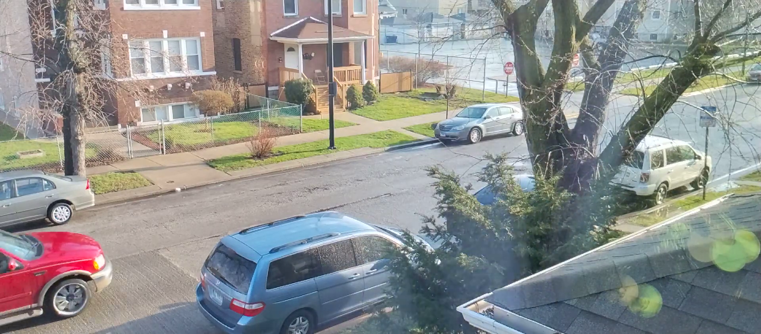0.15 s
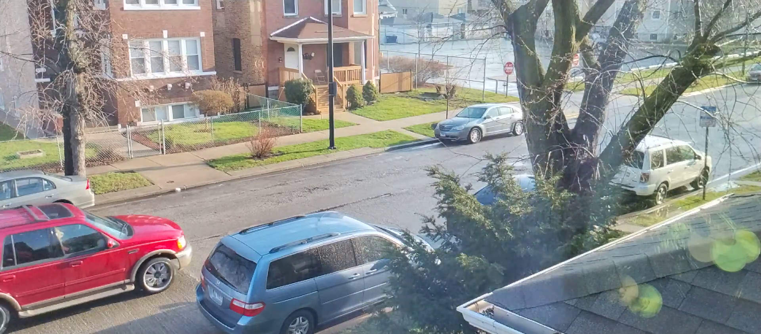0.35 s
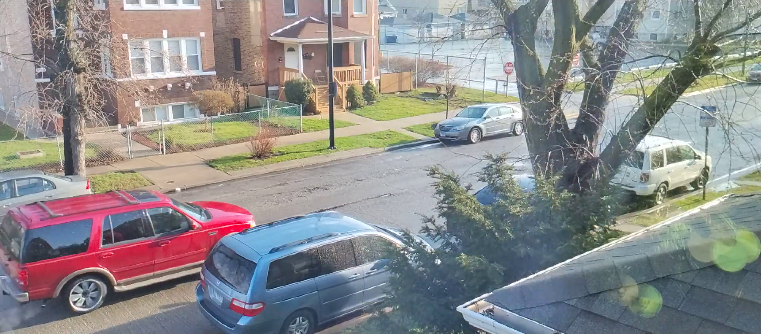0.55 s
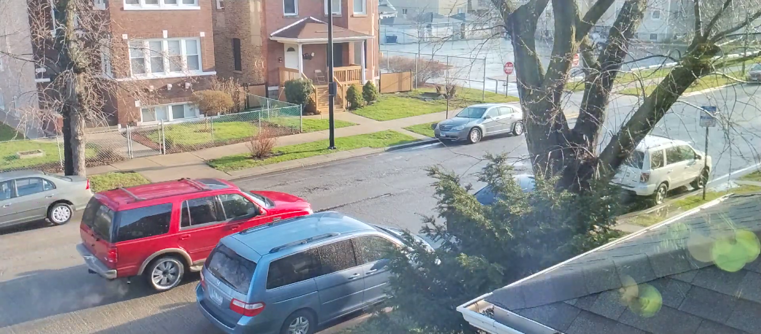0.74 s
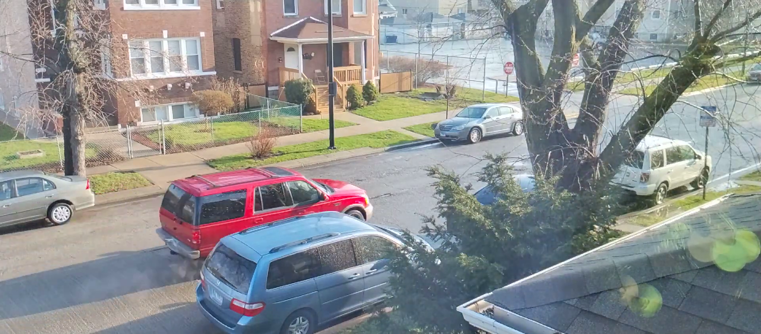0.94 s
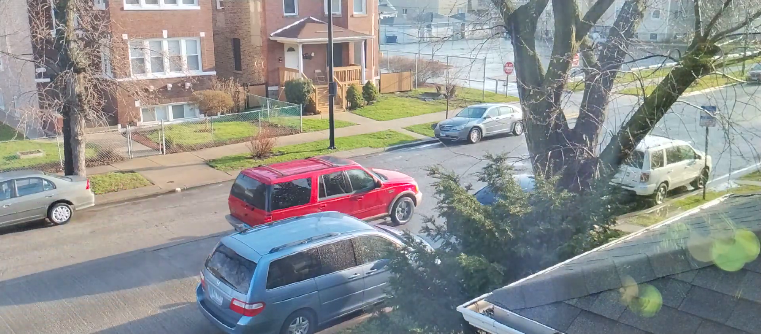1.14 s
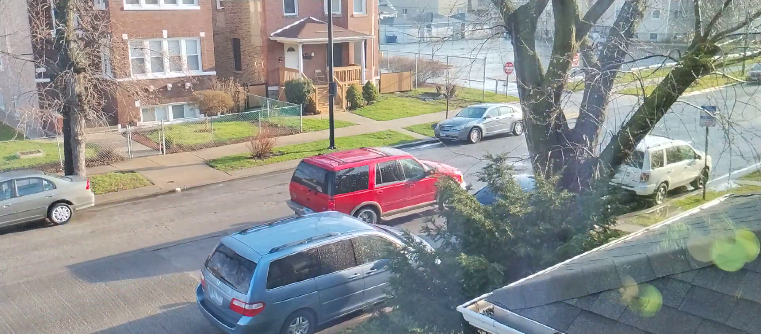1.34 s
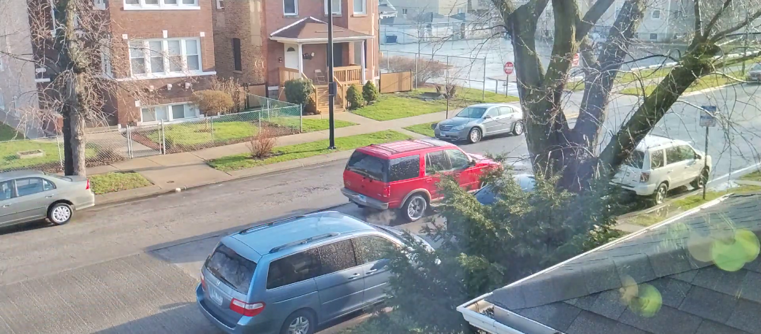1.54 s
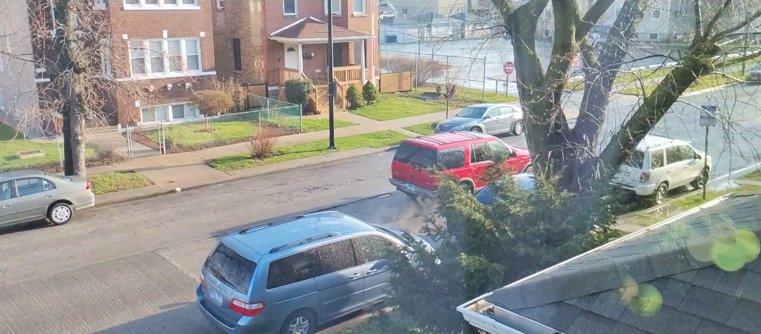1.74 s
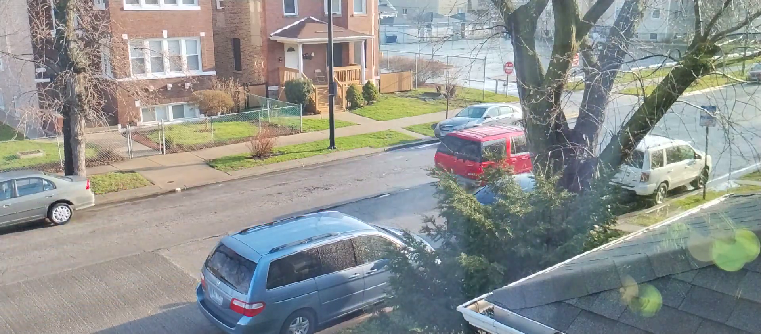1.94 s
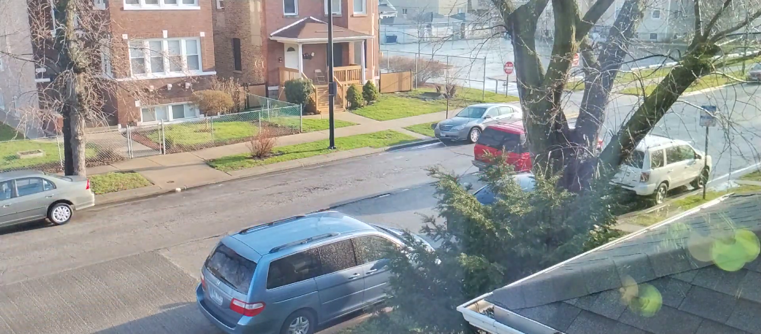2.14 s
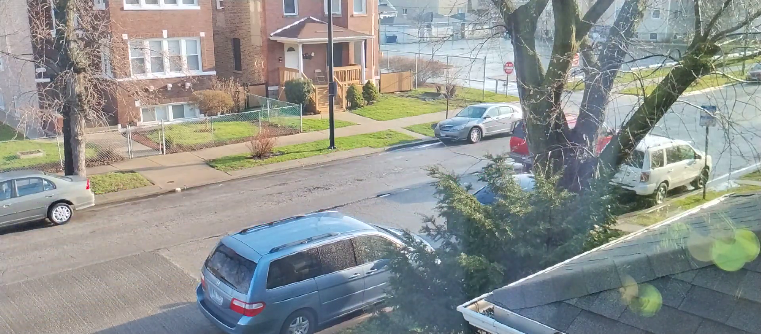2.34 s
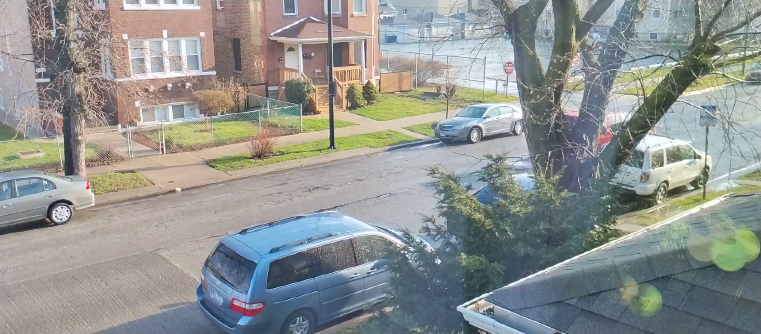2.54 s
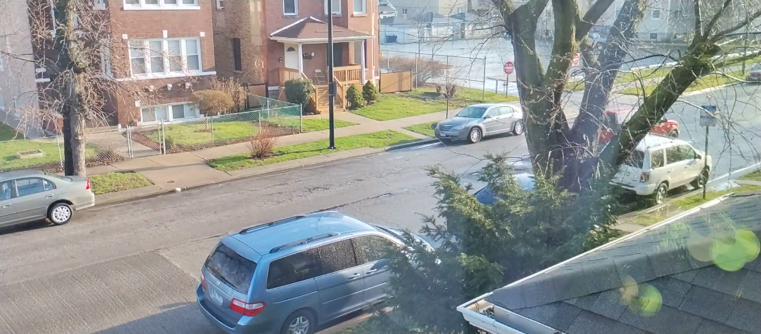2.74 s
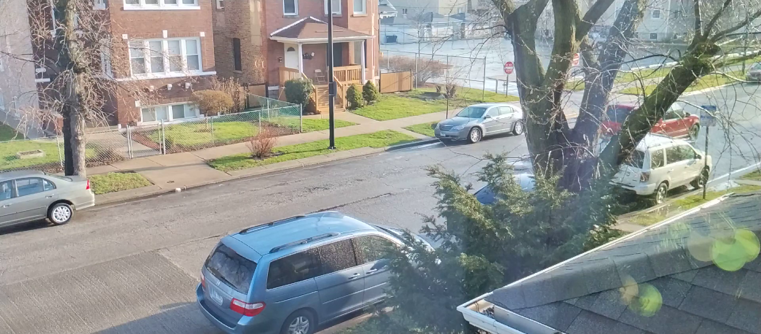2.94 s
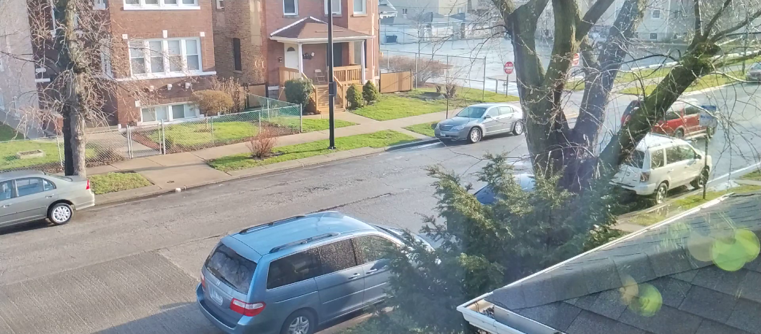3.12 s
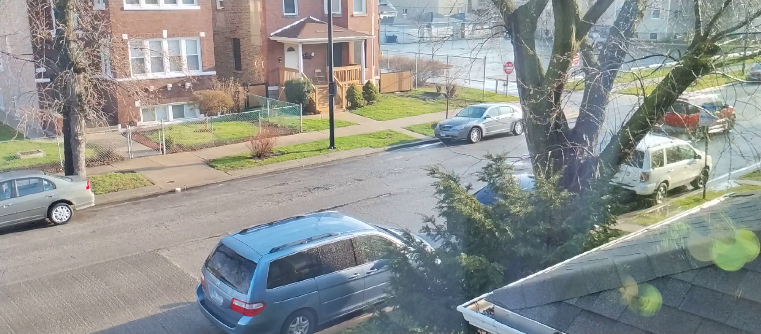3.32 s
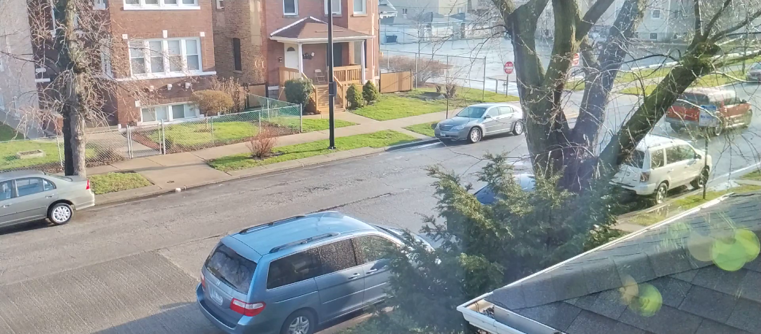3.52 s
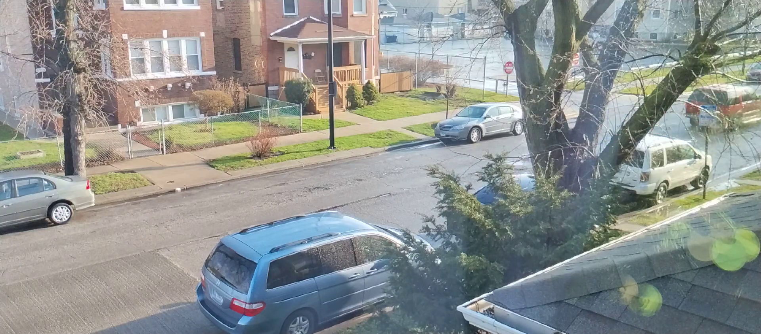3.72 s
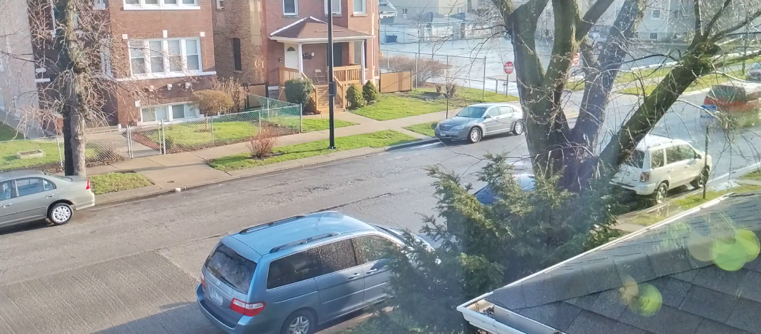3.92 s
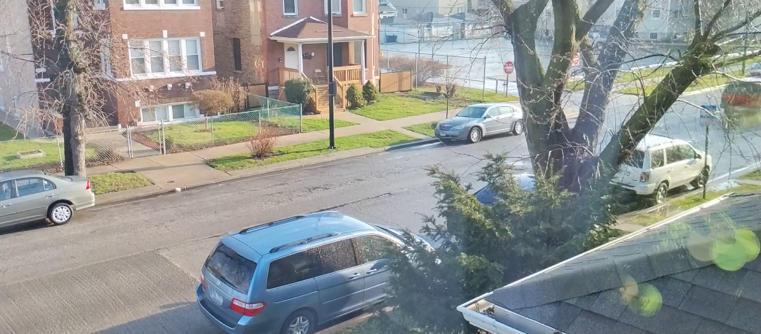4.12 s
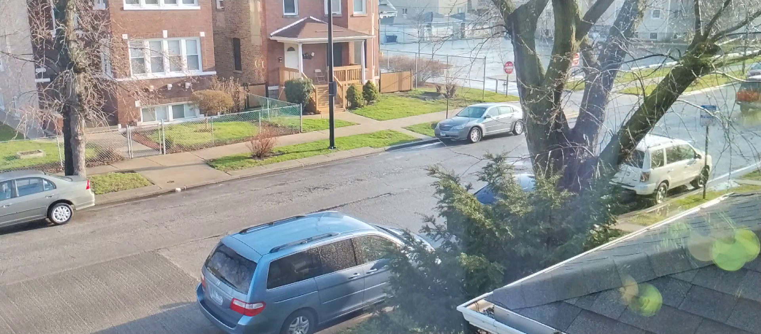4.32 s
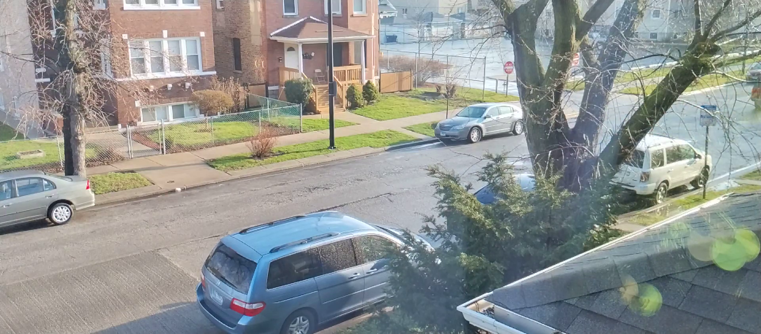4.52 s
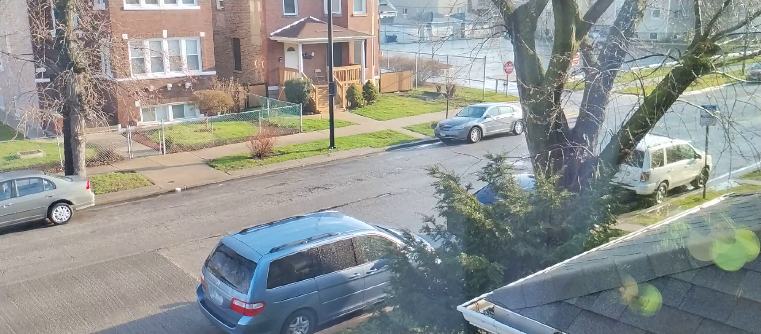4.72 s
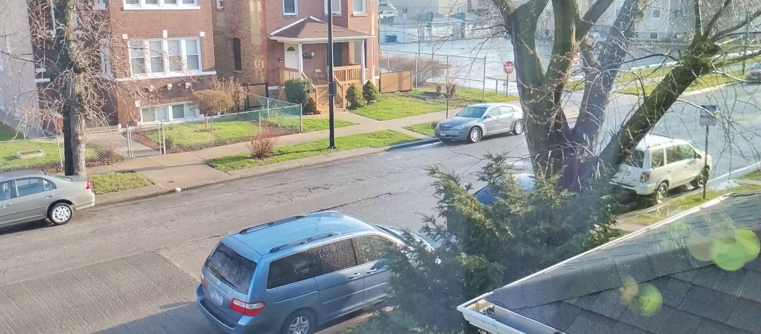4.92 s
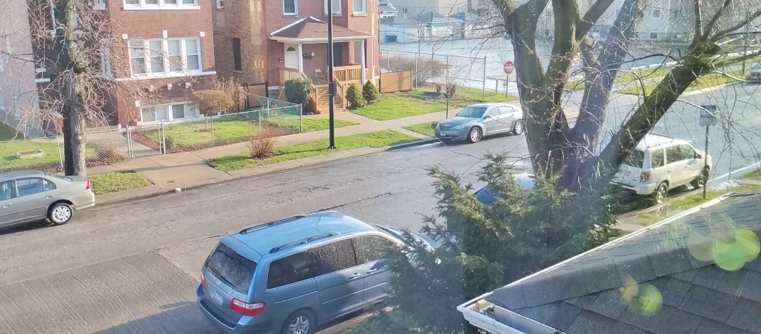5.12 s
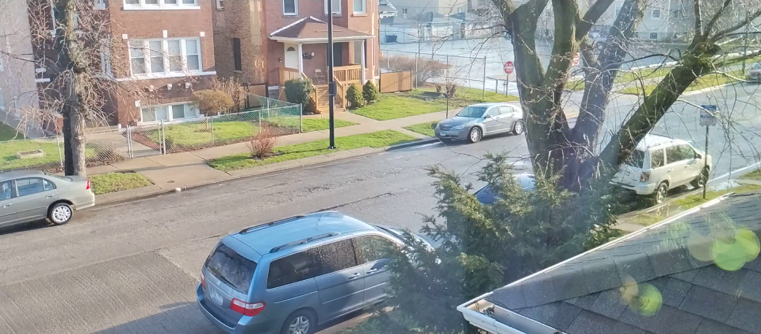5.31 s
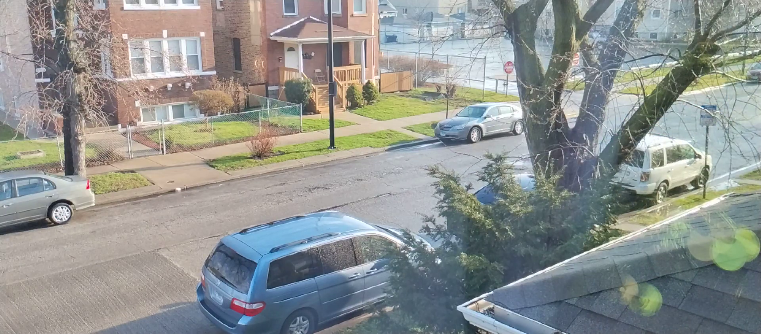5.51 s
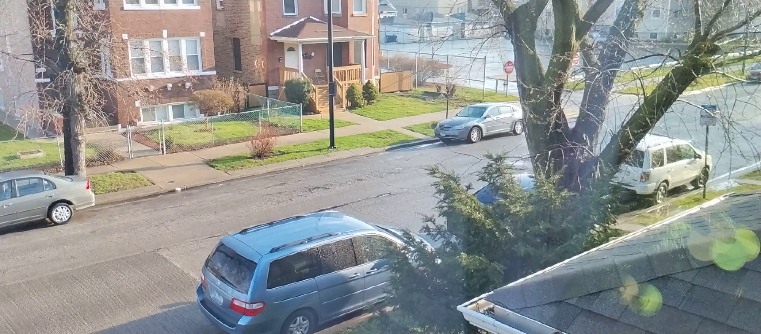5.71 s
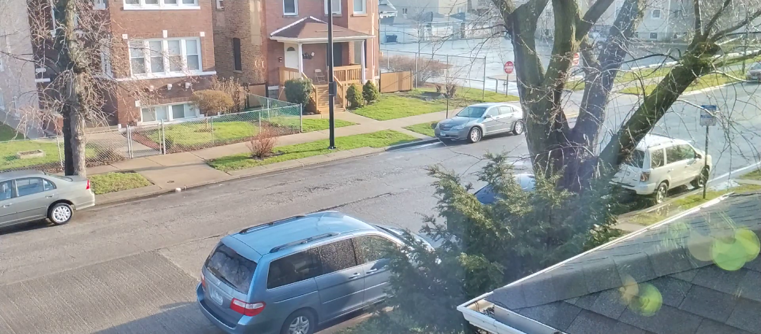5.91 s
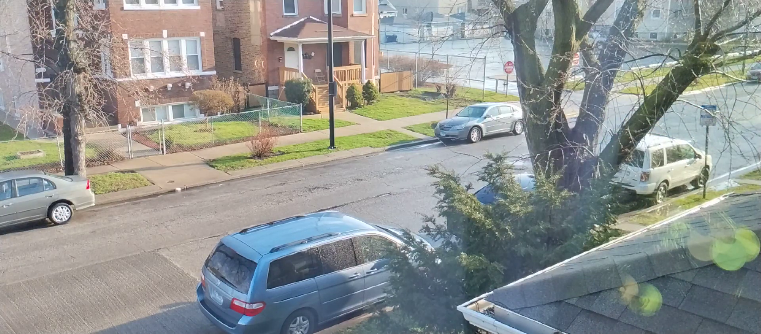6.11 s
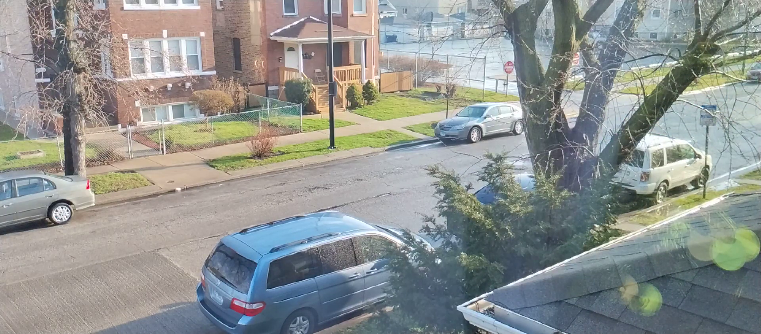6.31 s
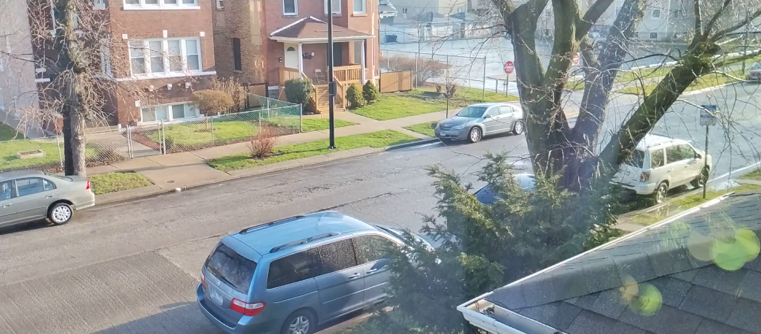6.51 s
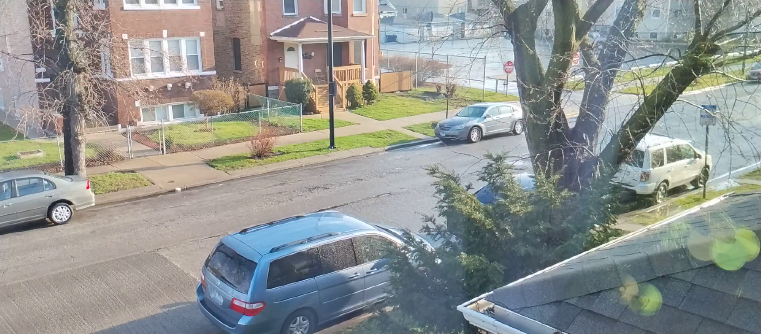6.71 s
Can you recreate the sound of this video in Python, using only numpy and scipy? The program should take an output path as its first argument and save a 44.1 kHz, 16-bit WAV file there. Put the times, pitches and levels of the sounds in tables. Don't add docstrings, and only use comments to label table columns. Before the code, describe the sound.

A stereo microphone in a furnished room catches close handling-like bumps, boomy footfalls and dragging furniture, while a vehicle outside adds only low rumble through glass. Fabric swishes near the first second. The bustle stops after two seconds, a sharp hollow crack is struck at about three, and then sparse, soft steps and clicks come from the next room over faint hiss, with a far bird chirping weakly.

```python
import sys
import numpy as np
from scipy import signal
from scipy.io import wavfile
from scipy.ndimage import uniform_filter1d

SR = 44100
rng = np.random.default_rng(int(sys.argv[2]) if len(sys.argv) > 2 else 0)


def convert_level_to_amplitude(level_db):
    exponent = np.asarray(level_db, float) / 20
    return 10 ** exponent


def dump(signal):
    limited = np.clip(np.atleast_2d(signal).T, -1, 1)
    pcm = np.round(limited * 32767).astype(np.int16)
    wavfile.write(sys.argv[1], SR, pcm)


N = 297965
TAIL = SR // 3
FAR_FROM_S = 3.5

# pitch_hz, level_db (per Hz)
BOARD_SPECTRUM = [(35, -48), (60, -1.5), (146, -0.5), (177, -8.5), (215, -1), (318, -11), (500, -45),
                  (650, -34), (1100, -120)]
SCRAPE_SPECTRUM = [(200, -12), (320, -4.5), (550, -3), (850, -6), (1200, -10), (1800, -15.5), (2600, -15.5),
                   (3500, -24)]
RUSTLE_SPECTRUM = [(900, -38), (1400, -2), (2200, 0.5), (3000, 0), (4300, -6.5), (6300, -5), (8500, -15),
                   (14600, -29)]
CLOTH_SPECTRUM = [(1000, -30), (1600, -1.5), (2300, -4.5), (3300, 9), (4200, -2.5), (5000, 6.5), (6300, 3),
                  (7500, -0.5), (9000, -13), (11000, -25), (14600, -8)]
# time_s, level_db
NEARNESS = [(0, -48), (.58, -36.5), (.66, -45.5), (.8, -44.5), (1.85, -41.5), (2.02, -43), (2.15, -58.5),
            (2.7, -52.5), (2.95, -61), (4.1, -64), (5.25, -70), (6.76, -83)]
# start_s, hold_s, level_db
SHIFTS = [(0.02, 0.074, -35), (.42, 0.0096, -29), (.5, 0.063, -41), (.74, 0.37, -41.5), (1.04, 0.033, -37),
          (1.13, 0.087, -33), (1.22, 0.22, -34.5), (1.515, 0.009, -25.5), (1.645, 0.033, -34.5),
          (1.81, 0.04, -40), (2.53, 0.13, -50), (3.25, 0.027, -54), (3.8, .1, -64), (2.3, 0.24, -53.5),
          (3.97, 0.081, -78), (4.3, 0.075, -60.5), (4.9, 0.061, -60), (5.45, 0.21, -59),
          (5.95, 0.056, -59.5), (6.5, 0.083, -60)]
# start_s, hold_s, level_db
SCRAPES = [(0, 0.1, -39), (.2, 0.12, -42.5), (.4, 0.057, -38.5), (.77, 0.21, -48), (1.095, .01, -46.5),
           (1.13, 0.19, -45), (1.29, 0.091, -35), (1.52, .02, -57), (1.6, 0.036, -50),
           (1.778, 0.017, -46.5), (1.96, 0.02, -67), (2.5, 0.17, -62), (3.25, 0.073, -68),
           (3.8, 0.069, -66.5), (5.03, 0.036, -69), (5.57, 0.072, -64.5), (6.11, 0.043, -65),
           (6.5, 0.16, -69.5)]
# start_s, hold_s, level_db
RUSTLES = [(0, 0.085, -59), (.2, 0.092, -55), (.4, 0.18, -52.5), (.76, 0.26, -52.5), (.98, 0.12, -47),
           (1.16, 0.31, -51.5), (1.55, 0.25, -51), (1.82, 0.15, -57), (2.55, 0.15, -64), (3.25, 0.075, -64),
           (3.8, 0.17, -67), (4.47, 0.012, -62), (5.02, 0.073, -65), (5.5, 0.2, -67), (6.12, 0.037, -64),
           (6.55, 0.17, -72)]
# start_s, hold_s, level_db
SLIDES = [
    (.72, 0.13, -66.5),
    (0.888, 0.18, -44.5),
    (1.21, 0.049, -57),
]
# pitch_hz, width_hz, share
CLOTH_RINGS = [(4230, 67, 1.5), (5500, 60, 0.65), (6660, 55, 0.97), (6750, 71, 1.4), (2960, 84, 0.38)]
RISE_DB_PER_S, FALL_DB_PER_S = 141, 120
SHIFT_RISE_DB_PER_S = 346
SLIDE_RISE_DB_PER_S, SLIDE_FALL_DB_PER_S, SLIDE_LEFT_DB = 178, 175, 1.5
SCRAPE_UNDER_DB, RUSTLE_UNDER_DB = -5.5, -23


def movement(field):
    stir = convert_level_to_amplitude(in_time(NEARNESS))

    def effort(rows, under_db, rise_db_per_s=RISE_DB_PER_S):
        return np.hypot(strokes(rows, rise_db_per_s, FALL_DB_PER_S), convert_level_to_amplitude(under_db) * stir)

    rumble = coloured(field, BOARD_SPECTRUM, patchy_db=1.0, rate_hz=34)
    rumble = rumble * grainy(per_s=45, spread_db=-1.5, t60_s=0.62)
    scrape = coloured(field, SCRAPE_SPECTRUM, patchy_db=1.2, rate_hz=12)
    scrape = scrape * grainy(per_s=500, spread_db=0.8, t60_s=0.25)
    rustle = coloured(field, RUSTLE_SPECTRUM, patchy_db=0.9, rate_hz=15)
    rustle = rustle * grainy(per_s=400, spread_db=1.1, t60_s=0.2)
    slide = coloured(field, CLOTH_SPECTRUM, patchy_db=1.2, rate_hz=14)
    slide = rms_one(ringing(slide, CLOTH_RINGS))

    slide_gain = convert_level_to_amplitude(5.5 + SLIDE_LEFT_DB * np.array([[1], [-1]]))
    slide_gain = slide_gain * strokes(SLIDES, SLIDE_RISE_DB_PER_S, SLIDE_FALL_DB_PER_S)
    out = convert_level_to_amplitude(-6.5) * effort(SHIFTS, 0, SHIFT_RISE_DB_PER_S) * rumble
    out = out + convert_level_to_amplitude(-3.5) * effort(SCRAPES, SCRAPE_UNDER_DB) * scrape
    out = out + convert_level_to_amplitude(2.5) * effort(RUSTLES, RUSTLE_UNDER_DB) * rustle
    return out + slide_gain * slide


# start_s, peak_db, pitch_hz, t60_s
HEELS = [(0.191, -26.5, 133, 0.17), (0.259, -27, 155, 0.055), (0.335, -24.5, 128, 0.28),
         (0.599, -34, 147, 0.032), (1.114, -33.5, 282, 1), (1.222, -23.5, 122, 0.31),
         (1.775, -55, 163, 0.12), (1.85, -17.5, 139, 0.14), (2.455, -41, 174, 0.2),
         (2.512, -34.5, 246, 0.1), (2.531, -34, 200, 0.076), (3.15, -25, 208, 0.27),
         (4.369, -36, 111, 0.22), (5.032, -46, 123, 0.25), (5.498, -58, 135, 0.29), (6.53, -51, 121, 0.52)]
# start_s, peak_db, pitch_hz, t60_s
SOLES = [(0.038, -30, 116, 0.37), (0.411, -22.5, 171, 0.077), (0.474, -26, 109, 0.061),
         (0.514, -29.5, 112, 0.24), (1.512, -20, 155, 0.23), (1.64, -27.5, 105, 0.23),
         (2.151, -36, 97, 0.34), (2.548, -35, 230, 0.057), (3.711, -49.5, 305, 0.36),
         (4.329, -38.5, 167, 0.66), (5.44, -51, 113, 0.29), (5.958, -53, 471, 0.15)]
HEEL_DIRECT_DB, SOLE_DIRECT_DB = -1.5, -12
JOIST_HZ, JOIST_SHARE = 57, 0.27


def thumps(field):
    out = np.zeros((2, N))
    for rows, direct_db in ((HEELS, HEEL_DIRECT_DB), (SOLES, SOLE_DIRECT_DB)):
        for s, db, hz, t60_s in rows:
            def colour(x):
                mode = resonance(resonance(x, hz, 0.59 * hz), hz, 0.5 * hz)
                joist = resonance(x, JOIST_HZ, 28)
                skirt = resonance(resonance(x, 1.2 * hz, 2.07 * hz), 1.86 * hz, 5.9 * hz)
                return mode + JOIST_SHARE * joist + 0.19 * skirt
            add(out, convert_level_to_amplitude(db - 14.5) * blow(field, colour, t60_s, direct_db, contact_s=0.0065), s)
    return out


# start_s, peak_db, pitch_hz, t60_s
KNOCKS = [(0.194, -31, 684, 0.13), (0.22, -45, 720, 0.36), (0.262, -34, 724, 0.035),
          (1.114, -57, 713, 0.38), (1.775, -41, 770, 1), (2.646, -35, 1780, 0.092),
          (3.92, -48.5, 2200, 0.22), (4.361, -26.5, 1380, 0.28), (5.048, -36.5, 1980, 0.23),
          (5.498, -41.5, 766, 0.37), (5.64, -47, 2620, 0.19), (6.068, -73, 2360, 0.3)]
# start_s, peak_db, pitch_hz, t60_s
MUFFLED = [
    (0.419, -34, 705, 0.34),
    (1.516, -35, 800, 0.95),
    (1.847, -28.5, 700, 0.58),
    (2.514, -37.5, 754, 0.21),
    (3.142, -16, 1680, 0.24),
    (3.655, -52, 2400, 0.18),
    (4.335, -47, 730, 0.3),
    (4.885, -48.5, 2550, 0.12),
]
# start_s, peak_db, pitch_hz, t60_s
CLICKS = [
    (0.11, -35, 1290, 0.13),
    (3.68, -50.5, 2920, 0.041),
    (3.828, -47.5, 1410, 0.058),
    (6.146, -41, 1390, 0.27),
    (6.562, -46.5, 1500, 0.45),
]
# start_s, peak_db, pitch_hz, t60_s
EDGY = [
    (2.549, -36.5, 830, 0.27),
    (4.437, -39.5, 1400, 0.16),
    (4.97, -44.5, 2450, 0.045),
]
# edge tick_db at middling strength, direct_db
KNOCK_KIND, MUFFLED_KIND, CLICK_KIND, EDGY_KIND = (-61, -7), (-61.5, -38), (-56, 7), (-50.5, 1.8)
TICK_FOLLOWS, MIDDLING_DB = 0.2, -44
EDGE_CUT_HZ, PORT_LEAK = 7400, 0.07


def taps(field):
    out = np.zeros((2, N))
    kinds = ((KNOCKS, KNOCK_KIND), (MUFFLED, MUFFLED_KIND), (CLICKS, CLICK_KIND), (EDGY, EDGY_KIND))
    for rows, (tick_db, direct_db) in kinds:
        for s, db, hz, t60_s in rows:
            tick_gain = convert_level_to_amplitude(tick_db - MIDDLING_DB + (TICK_FOLLOWS - 0.5) * (db - MIDDLING_DB))

            def colour(x):
                body = resonance(resonance(x, hz, 0.43 * hz), hz, 0.38 * hz)
                clack = resonance(resonance(x, 1050, 550), 2610, 1460)
                tick = resonance(resonance(x, 5700, 4700), 5700, 4700)
                return 0.61 * body + 1.52 * clack - tick_gain * tick
            walled_db = direct_db - 4.6 * (s > FAR_FROM_S)
            add(out, convert_level_to_amplitude(db - 16.5) * blow(field, colour, t60_s, walled_db, contact_s=0.00056), s)
    dulled = signal.sosfilt(signal.butter(10, EDGE_CUT_HZ, fs=SR, output="sos"), out)
    return dulled + PORT_LEAK * resonance(out, 12500, 2500)


# start_s, peak_db, pitch_hz,
# width_hz, t60_s
STRUCK_RINGS = [(0.111, -55, 2530, 1190, 0.028), (.195, -40, 536, 160, 0.23), (.215, -60, 690, 250, 0.087),
                (1.113, -45, 536, 83.33, 0.073), (1.777, -56, 760, 250, 0.07), (1.85, -39, 610, 413, 0.29),
                (1.85, -39.5, 257, 90.5, 0.48), (2.512, -50, 393, 164.2, 0.15),
                (2.52, -53, 1270, 185.2, 0.097), (2.649, -53.5, 2000, 200, 0.16),
                (3.143, -40.5, 840, 316, 0.59), (3.146, -43, 2620, 733, 0.34), (3.15, -44, 476, 200, 0.42),
                (3.711, -64, 546, 231.5, 0.12), (4.361, -51, 1376, 150, 0.21), (5.5, -64.5, 437, 356, 0.13),
                (6.061, -69, 1460, 200, .3), (6.146, -81, 1430, 250, 0.3), (6.564, -61.5, 1390, 300, 0.74)]
# start_s, peak_db, pitch_hz,
# width_hz, t60_s
SMALL_RINGS = [(1.057, -47.5, 346, 200, 0.12), (1.139, -40, 272, 70, 0.15), (1.17, -42.5, 500, 150, 0.8),
               (1.262, -48, 130, 70, 0.13), (1.3, -39, 335, 150, 0.12), (1.335, -47, 685, 150, 0.055),
               (1.361, -61, 1010, 400, 0.14), (1.857, -41, 200, 80, 0.17), (3.141, -51, 5400, 1820, 0.076),
               (3.185, -49, 1800, 900, 0.044), (4.354, -62.5, 6000, 4000, 0.21), (4.44, -62, 7200, 1200, 0.11),
               (4.709, -73, 1500, 1200, .08), (5.049, -61, 2900, 1500, 0.16), (5.449, -69, 700, 500, 0.2),
               (5.499, -65.5, 3280, 700, 0.3), (5.642, -71, 2450, 200, .08), (6.067, -68, 2200, 2000, 0.27),
               (6.127, -71, 2500, 2500, .1), (6.148, -61.5, 3060, 600, 0.12), (6.533, -64.5, 900, 900, .15),
               (6.563, -60, 2560, 1200, 0.33), (1.116, -37, 282, 79, 0.083), (0.194, -43.5, 293, 119, 0.13),
               (3.151, -47.5, 428, 131, 0.21), (5.052, -57, 1500, 600, 0.11), (6.148, -71, 1470, 250, 0.32),
               (2.651, -59, 2100, 250, 0.073), (4.363, -58, 2650, 500, .1), (1.862, -44, 3200, 900, 0.13),
               (1.38, -44.5, 740, 300, 0.066), (4.9, -79, 380, 200, .2), (5.42, -73, 377, 150, 0.26),
               (.214, -43, 590, 200, .08), (1.19, -57, 537, 90, 0.17), (2.549, -48, 230, 50, 0.084),
               (2.66, -66, 3730, 300, .04), (3.142, -49, 800, 900, .05), (1.865, -42.5, 440, 398, 0.18),
               (1.24, -46, 750, 500, .4), (4.443, -64, 7000, 1200, 0.027), (5.45, -68.5, 500, 400, 0.17),
               (2.648, -62, 2090, 90, 0.067), (3.143, -46, 1830, 110, .35), (3.143, -54, 1430, 50, 0.29),
         (3.143, -40, 2040, 50, .3), (4.362, -55, 2010, 80, 0.18), (4.362, -52, 2340, 120, 0.22),
         (4.362, -59, 2750, 60, 0.17), (4.401, -63, 1430, 120, .2), (5.05, -60, 2440, 200, 0.076),
         (5.96, -74, 452, 250, 0.18), (6.146, -68, 1000, 200, 0.069), (6.58, -78, 1480, 120, .5)]


def rings(field, rows):
    out = np.zeros((2, N))
    for s, db, hz, width_hz, t60_s in rows:
        def colour(x):
            return resonance(resonance(x, hz, width_hz), hz, 2 * width_hz)
        direct_db = -3.0 - 4.3 * (s > FAR_FROM_S)
        add(out, convert_level_to_amplitude(db) * blow(field, colour, t60_s, direct_db, contact_s=0.00039), s)
    return out


# start_s, peak_db, pitch_hz
SNAPS = [(.1095, -21.5, 1500), (.1118, -28, 3200), (.193, -34, 550), (.417, -27, 170), (.437, -29, 170),
         (.217, -33, 600), (.478, -32, 350), (1.1168, -31, 550), (1.854, -22, 230), (1.223, -30, 130),
         (1.259, -30, 140), (1.513, -26, 150), (1.526, -24, 150), (1.546, -27, 160), (1.777, -35.5, 650),
         (1.781, -37, 250), (1.8478, -20, 720), (2.4632, -42, 850), (2.4645, -41, 210), (2.509, -41, 600),
         (2.648, -43, 2100), (3.1422, -26, 1300), (3.1455, -27, 900), (3.1494, -17.5, 2200),
         (3.166, -26, 1700), (3.175, -27, 1900), (3.1865, -26, 1800), (3.225, -32, 1300),
         (4.355, -46, 1500), (4.3608, -36, 1900), (4.3655, -35, 1300), (4.376, -34, 1500),
         (4.382, -35, 1500), (4.407, -37, 1400), (5.0505, -43, 2300), (5.502, -57, 600), (6.148, -55, 1200),
         (6.564, -53, 2400)]
SNAP_WIDTH, SNAP_BODY, SNAP_CUT_HZ = 0.8, 0.45, 5000


def snaps():
    out = np.zeros((2, N))
    push = np.eye(1, TAIL)[0]
    for s, db, hz in SNAPS:
        swing = resonance(resonance(push, hz, SNAP_WIDTH * hz), hz, hz)
        swing = resonance(swing, SNAP_BODY * hz, 2 * hz)
        add(out, convert_level_to_amplitude(db) * two_ports(swing / np.abs(swing).max()), s)
    return signal.sosfilt(signal.butter(4, SNAP_CUT_HZ, fs=SR, output="sos"), out)


CAR_NEAREST_S, CAR_NEAREST_M, CAR_M_PER_S, CAR_DB = 0.95, 2.8, 14.4, -48.5


def car(field):
    metres = np.hypot(CAR_NEAREST_M, CAR_M_PER_S * (np.arange(N) / SR - CAR_NEAREST_S))
    spectrum = [(24, -7), (42, 14), (60, -32.0), (90, 10.0)]   # pitch_hz, level_db
    throb = coloured(field, spectrum, patchy_db=-2.5, rate_hz=2.1)
    return convert_level_to_amplitude(CAR_DB) * CAR_NEAREST_M / metres * throb


# start_s, length_s, start_hz, end_hz, level_db
CHIRPS = [
    (4.686, 0.048, 4630, 2290, -72),
    (5.278, 0.036, 4100, 2200, -71.5),
    (5.865, .03, 4000, 2470, -71),
]


def bird():
    out = np.zeros(N)
    for s, length_s, start_hz, end_hz, db in CHIRPS:
        count = int(length_s * SR)
        turns = np.cumsum(np.geomspace(start_hz, end_hz, count)) / SR
        whistle = signal.windows.tukey(count, 0.3) * np.sin(2 * np.pi * turns)
        out[int(s * SR):][:count] = convert_level_to_amplitude(db) * whistle
    out = out * flicker(spread_db=5, rate_hz=250)
    echoes = []
    for lags in ((0, 230, 520, 900), (9, 310, 640, 1010)):
        echoes.append(sum(0.8 ** k * np.roll(out, lag) for k, lag in enumerate(lags)))
    return np.array(echoes) * convert_level_to_amplitude([[0.1], [-4.5]])


# pitch_hz, level_db (per Hz)
QUIET_SPECTRUM = [(15, -42), (25, -16), (120, 6), (178, -2), (239, -5.5), (502, -31), (727, -14.5),
                  (974, -9.5), (1890, -32.5), (3130, -11), (4920, -21), (6240, -22), (7320, -21.5),
                  (12100, -25), (14600, -31)]
# pitch_hz, level_db
QUIET_LEFT_LOUDER = [(60, 13.5), (150, -1), (370, 18), (910, 1.5), (2250, 6.5), (5560, 13.5), (13800, 11)]
# pitch_hz, width_hz, share
QUIET_BANDS = [(2260, 100, 1), (3060, 75, 0.52), (3800, 70, 0.8), (1270, 80, 0.73)]
QUIET_DB = -68.5
HISS_LIFT_DB, STIR_ENDS_S, HISS_SETTLES_S = 5, 2.28, 0.4


def quiet(field):
    murmur = coloured(field, QUIET_SPECTRUM, patchy_db=2.5, rate_hz=28, balance=QUIET_LEFT_LOUDER)
    murmur = murmur + 1.45 * resonance(murmur, 6180, 560)
    since_s = np.maximum(np.arange(N) / SR - STIR_ENDS_S, 0)
    lift_db = HISS_LIFT_DB * np.exp(-since_s / HISS_SETTLES_S)
    gain = convert_level_to_amplitude(QUIET_DB + 1.5 + lift_db) * flicker(spread_db=0.7, rate_hz=6)
    return gain * ringing(murmur, QUIET_BANDS)


# pitch_hz, t60_share
T60_SHARE = [(60, 1.34), (250, 1.05), (1000, 1.37), (3000, 1.34), (8000, 0.76)]


def blow(field, colour, t60_s, direct_db, contact_s):
    t = np.arange(TAIL) / SR
    start = rng.integers(N - TAIL)
    coarse_t = t[::20]
    band_t60_s = max(t60_s, 0.02) * at_hz(T60_SHARE, CENTRES_HZ)[:, None]
    fading = convert_level_to_amplitude(-40 * coarse_t / band_t60_s - 340 * coarse_t ** 2)
    leaning = convert_level_to_amplitude(at_hz(LEFT_LOUDER, CENTRES_HZ)[:, None] * np.array([0.5, -0.5])).astype(np.float32)
    steps = field[:, :, start:start + TAIL].reshape(len(CENTRES_HZ), 2, -1, 20)
    gains = np.float32(fading)[:, None] * leaning[:, :, None]
    tail = np.einsum("bcts,bct->cts", steps, gains).reshape(2, TAIL)
    swell_s = 0.0019 * convert_level_to_amplitude(-0.4 * direct_db)
    tail = colour(tail * (1 - np.exp(-t / swell_s)))
    walls = uniform_filter1d(rng.standard_normal(TAIL), size=130) * np.sqrt(130)
    tail = tail * convert_level_to_amplitude(2.5 * walls * np.exp(-t / 0.091))
    push = rng.standard_normal(TAIL) * np.exp(-t / max(contact_s, 1e-4))
    direct = two_ports(colour(push))
    tail = tail / np.std(tail[:, :TAIL // 10])
    return tail + convert_level_to_amplitude(direct_db) * direct / np.std(direct[:, :TAIL // 60])


def add(out, x, s):
    at = int(s * SR)
    out[:, at:at + TAIL] += x[:, :N - at]


FAR_BLUR = 0.56


def strokes(rows, rise_db_per_s, fall_db_per_s):
    t = np.arange(0, N + 64, 64) / SR
    s, hold_s, db = np.transpose(rows)[:, :, None]
    below_db = rise_db_per_s * np.maximum(s - t, 0) + fall_db_per_s * np.maximum(t - s - hold_s, 0)
    below_db = below_db * np.where(s > FAR_FROM_S, FAR_BLUR, 1)
    gain = np.sqrt(np.sum(convert_level_to_amplitude(db - below_db) ** 2, axis=0))
    return np.interp(np.arange(N) / SR, t, gain)


def grainy(per_s, spread_db, t60_s):
    sizes = convert_level_to_amplitude(2 * spread_db * np.minimum(rng.exponential(1, N), 3.5))
    jolts = sizes * (rng.random(N) < per_s / SR)
    keep = convert_level_to_amplitude(-120 / (t60_s * SR))
    settled = [jolts.mean() / (1 - keep)]
    power = signal.lfilter([1], [1, -keep], jolts + 1e-9, zi=settled)[0]
    return rms_one(np.sqrt(power))


def flicker(spread_db, rate_hz):
    r = np.exp(-80 * np.pi * rate_hz / SR)
    slow = signal.lfilter([1], [1, -2 * r, r * r], rng.standard_normal(N // 40 + 2002))[2000:]
    return np.interp(np.arange(N) / 40, np.arange(len(slow)), convert_level_to_amplitude(spread_db * rms_one(slow)))


# pitch_hz, level_db
LEFT_LOUDER = [(60, 2), (130, 2), (280, 1.5), (620, 7.5), (1340, 5), (2910, 8), (6330, 5), (13800, -6)]


def coloured(field, spectrum, patchy_db, rate_hz, balance=LEFT_LOUDER):
    shift, out = rng.integers(N), 0
    for hz, band in zip(CENTRES_HZ, field):
        if spectrum[0][0] < hz < spectrum[-1][0]:
            lean = convert_level_to_amplitude(at_hz(balance, hz) * np.array([[0.5], [-0.5]]))
            gain = lean * convert_level_to_amplitude(at_hz(spectrum, hz)) * flicker(patchy_db, rate_hz)
            out = out + np.roll(band, shift, axis=1) * gain
    return rms_one(out)


EDGES_HZ = 25 * 2 ** np.arange(0, 9.4, 1 / 3)
CENTRES_HZ = np.sqrt(EDGES_HZ[1:] * EDGES_HZ[:-1])
# pitch_hz, correlation
LIKENESS = [(60, 0.97), (150, 0.96), (370, 0.91), (620, 0.43), (1000, -0.34), (2250, -0.01),
            (5560, -0.0011), (13800, -0.11)]


def diffuse_field():
    white = rng.standard_normal((2, 2, N + 8000))
    bands = np.empty((len(CENTRES_HZ), 2, N), np.float32)
    for k, hz in enumerate(CENTRES_HZ):
        band_pass = signal.butter(2, EDGES_HZ[k:k + 2], "band", fs=SR, output="sos")
        mid, side = signal.sosfilt(band_pass, white[k % 2])[:, -N:]
        alike = np.clip(at_hz(LIKENESS, hz), -1, 1)
        bands[k] = np.sqrt(1 + alike) * mid + np.sqrt(1 - alike) * side * [[1], [-1]]
    return bands


SHADOW_HZ, SHADOW_DB, SHADOW_LAG_SAMPLES = 450, -6, 14


def two_ports(x):
    low = signal.lfilter(*signal.butter(1, SHADOW_HZ, fs=SR), x)
    far = low + convert_level_to_amplitude(SHADOW_DB) * np.roll(x - low, SHADOW_LAG_SAMPLES)
    return np.array([x, far]) * convert_level_to_amplitude([[2.0], [-1.0]])


def resonance(x, hz, width_hz):
    r = np.exp(-np.pi * max(width_hz, 5) / SR)
    zeros = (1 - r * r) / 2 * np.array([1, 0, -1])
    poles = [1, -2 * r * np.cos(2 * np.pi * hz / SR), r * r]
    return signal.lfilter(zeros, poles, x + 1e-18)


def ringing(x, rows):
    return x + sum(share * resonance(x, hz, width_hz) for hz, width_hz, share in rows)


def rms_one(x):
    return x / np.sqrt(np.mean(x ** 2) + 1e-20)


def at_hz(points, hz):
    points_hz, value = np.transpose(points)
    return np.interp(np.log(hz), np.log(points_hz), value)


def in_time(rows):
    s, level = np.transpose(rows)
    return np.interp(np.arange(N) / SR, s, level)


# pitch_hz, width_hz, share
ROOM_RINGS = [(619, 9.8, 0.59), (684, 10, 0.29), (963, 12, 0.43), (1268, 51, 0.4), (1450, 48, 0.49),
              (1716, 19, 0.35), (1880, 14, 0.29), (2070, 21, 0.35), (2378, 22, .7), (2733, 14, 0.53)]


def scene():
    field = diffuse_field()
    blows = thumps(field) + taps(field) + rings(field, STRUCK_RINGS)
    far = car(field) + bird() + quiet(field)
    indoors = movement(field) + blows + rings(field, SMALL_RINGS)
    return ringing(indoors, ROOM_RINGS) + snaps() + far


def band_limit(x):
    return signal.sosfilt(signal.butter(12, 14270, fs=SR, output="sos"), x)


RIGHT_BASS_CUT_HZ = 39


def record(dry):
    cut = signal.sosfilt(signal.butter(3, 45, "high", fs=SR, output="sos"), dry)
    cut[1] = signal.lfilter(*signal.butter(1, RIGHT_BASS_CUT_HZ, "high", fs=SR), cut[1])
    cut = signal.sosfilt(signal.cheby2(14, 60, 15600, fs=SR, output="sos"), cut)
    return band_limit(cut)


dry = scene()
out = record(dry)
dump(out)
```